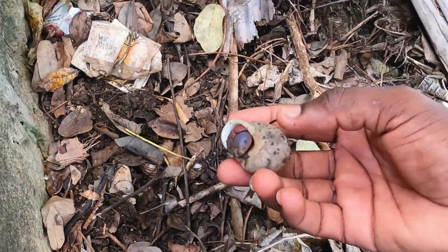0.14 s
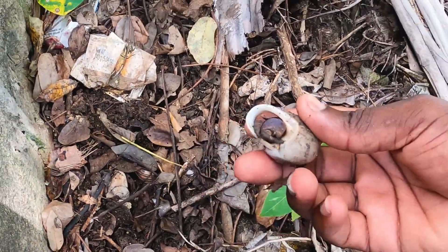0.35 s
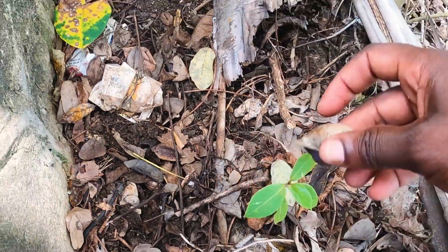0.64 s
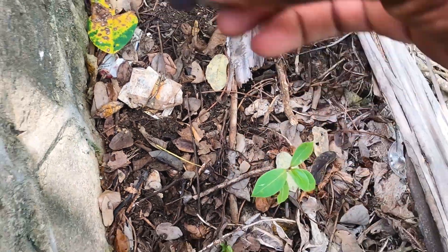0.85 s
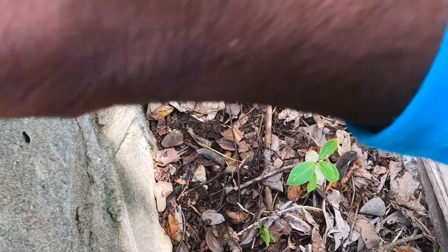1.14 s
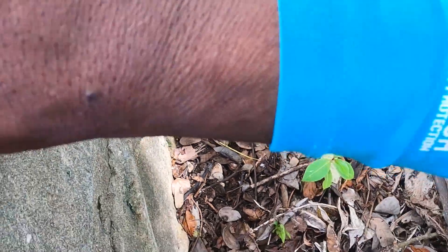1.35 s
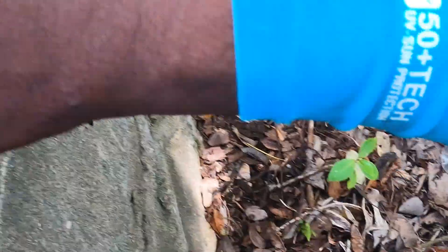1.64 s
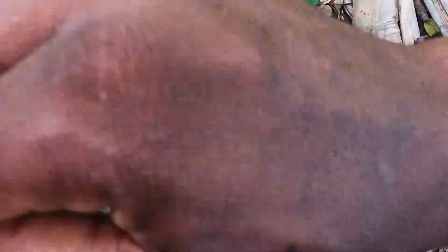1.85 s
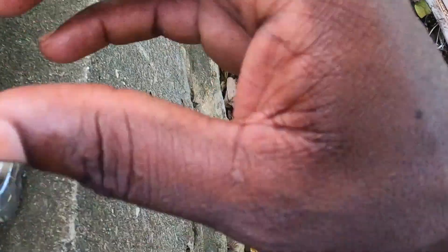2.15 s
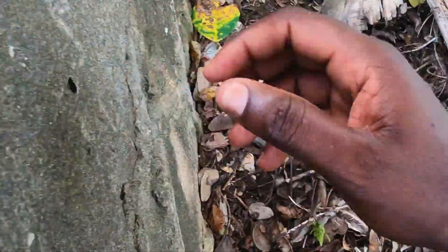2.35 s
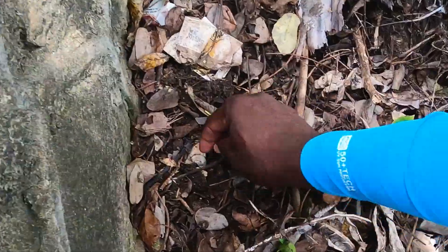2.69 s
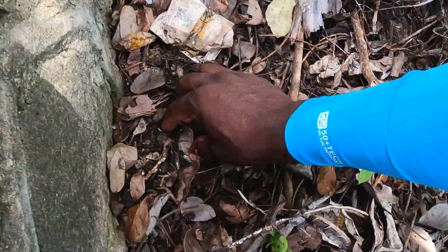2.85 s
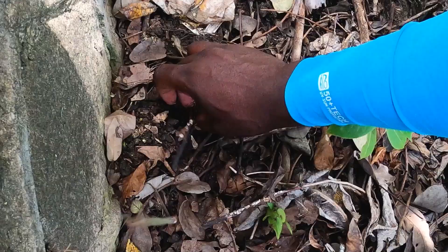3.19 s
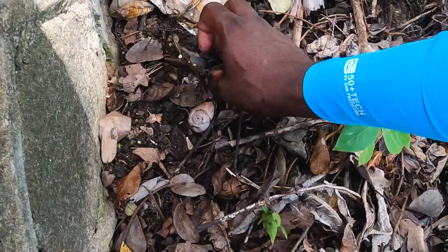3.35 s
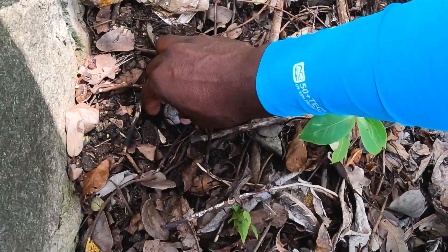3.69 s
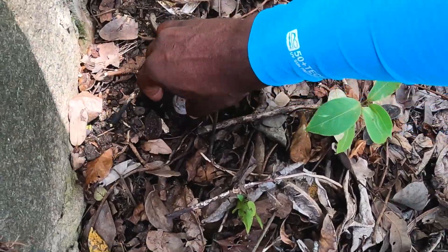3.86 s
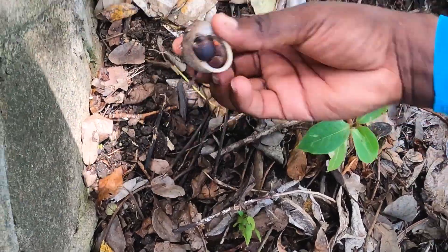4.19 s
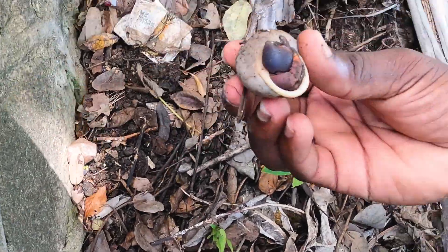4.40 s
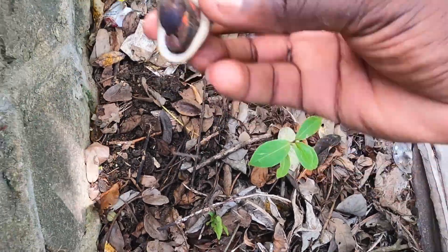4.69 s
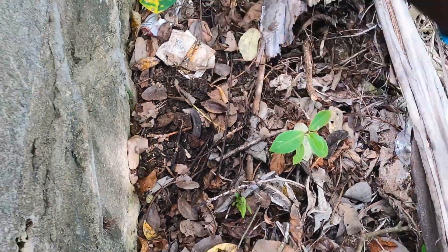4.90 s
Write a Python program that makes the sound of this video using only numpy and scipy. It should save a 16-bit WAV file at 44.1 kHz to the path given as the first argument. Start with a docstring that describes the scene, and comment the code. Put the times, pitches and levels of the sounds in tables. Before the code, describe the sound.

Handling thumps and skin creaks on a held plastic case, with sharp nail clicks, small twig snaps and quiet rustling leaf litter.

```python
"""Shifting fingers knock and creak on the case of a phone held outdoors: struck and rubbed damped modes.
The other hand picks hermit crabs out of dry leaf litter: coloured sprays of tiny bursts make the leaves crackle,
bright puffs of noise with short hollow notes make the twigs snap. A few fingernail clicks ring the case.
A low distant rumble and a faint hiss, both coloured noise, lie behind.
The phone's gain control ducks everything after the loudest knocks."""
import sys
import numpy as np
from scipy import signal
from scipy.fft import rfft, irfft
from scipy.io import wavfile
from scipy.ndimage import uniform_filter1d, minimum_filter1d

SR = 44100
rng = np.random.default_rng(int(sys.argv[2]) if len(sys.argv) > 2 else 0)


def materialize(psi):
    """Save the field psi as 16-bit PCM at rate SR to the path in sys.argv[1].

    A 1-D psi becomes a single channel; in a 2-D psi each row is a channel.
    """
    bounded = np.clip(np.atleast_2d(psi).T, -1, 1)
    quanta = np.round(bounded * 32767).astype(np.int16)
    wavfile.write(sys.argv[1], SR, quanta)


N = 221955
TIME = np.arange(N) / SR
HIT_TIME = np.arange(4096) / SR  # s, span of one short sound
ATTACK_SAMPLES = 441  # the first 10 ms, over which a short sound's level is set


def undb(db):
    """Decibels to gain."""
    return 10 ** (np.asarray(db) / 20)


def unit(x, count=None):
    """Scale to rms 1, judged over the first count samples."""
    return x / np.sqrt(np.mean(x[:count] ** 2) + 1e-18)


def colour(x, points):
    """Filter x by a smooth curve of (f/Hz, level/dB) points, then bring it to rms 1."""
    hz, db = np.transpose(points)
    bins = np.maximum(np.fft.rfftfreq(len(x), 1 / SR), 1)
    gain = undb(np.interp(np.log(bins), np.log(hz), db))
    return unit(irfft(rfft(x) * gain, len(x)))


def add(out, s, sound):
    """Mix a sound in at s seconds."""
    i = int(np.clip(s * SR, 0, N - 1))
    out[i:i + len(sound)] += sound[:N - i]


def swell(start_s, length_s, attack_s, release_s):
    """Envelope of a stroke: it rises to its start, holds for its length and dies away."""
    rise = np.clip(1 + (TIME - start_s) / attack_s, 0, 1)
    return rise * np.exp(-np.clip((TIME - start_s - length_s) / release_s, 0, 20))


def burst(points, decay_s):
    """A dying puff of coloured noise, at rms 1 during its attack."""
    noise = colour(rng.standard_normal(len(HIT_TIME)), points)
    return unit(noise * np.exp(-HIT_TIME / decay_s), ATTACK_SAMPLES)


def drive(force, response):
    """Sound of a body pushed by a force: the force convolved with the body's response."""
    return signal.fftconvolve(force, response)[:len(force)]


def spray(rate, spread_db, length_s):
    """Random little bursts of noise, rate per second, mostly small with a few large ones."""
    size = undb(spread_db * np.minimum(rng.exponential(size=N), 4))
    starts = (rng.random(N) < rate / SR) * size
    power = drive(starts ** 2, np.exp(-HIT_TIME / length_s))
    return np.sqrt(np.abs(power)) * rng.standard_normal(N)


def contact(slip_s, grit):
    """Force of a contact: one sharp push, then a dying spray of tiny slips."""
    force = rng.standard_normal(len(HIT_TIME)) * np.exp(-HIT_TIME / slip_s)
    force *= grit / np.linalg.norm(force)
    force[0] += 1
    return force


def ring(modes, scatter_db, detune, stretch=1):
    """Impulse response of damped modes; each contact point weights and tunes them a little differently."""
    hz, db, t60 = np.array(modes).T[:, :, None]
    size, shift = rng.standard_normal((2, len(modes), 1))
    polarity = (-1) ** np.arange(len(modes))[:, None]
    swing = np.sin(2 * np.pi * hz * stretch * (1 + detune * shift) * HIT_TIME)
    envelope = undb(db + scatter_db * size - 60 * HIT_TIME / t60)
    return np.sum(polarity * envelope * swing, axis=0)


# spectrum of the distant rumble and hiss: f/Hz, relative level/dB per Hz
AIR_COLOUR = [(20, -8), (45, -8), (75, 1), (95, -6), (118, 0), (160, -14), (250, -11.5), (340, -23),
              (750, -20), (1300, -27), (2400, -37), (6000, -42.5), (12000, -49), (16000, -59)]
AIR_DB = -46


def air():
    """Far-off rumble with a smooth hiss above it: steady noise with a falling spectrum."""
    return undb(AIR_DB) * colour(rng.standard_normal(N), AIR_COLOUR)


# tone of the dry leaves: f/Hz, relative level/dB
LEAF_COLOUR = [(600, -22), (1800, -16), (3500, -7), (6000, -8.5), (9000, -8.5), (13000, -7.5), (16000, -15)]
# strokes of the hand stirring the leaves: start t/s, length t/s, level/dB
RUSTLES = [(0.031, 0.028, -58), (0.756, 0.09, -60.5), (.97, 0.13, -63.5), (2.49, 1, -64),
           (2.684, 0.034, -54.5), (2.838, 0.054, -56), (3.009, 0.041, -53.5), (3.419, 0.035, -57.5),
           (4.02, 0.039, -60), (4.789, .05, -66)]
RUSTLE_ATTACK_S, RUSTLE_RELEASE_S = 0.026, .04
LITTER_DB = -67.5  # faint crackle between rustles


def leaves():
    """Dry leaves bend and scrape: countless tiny cracks, each smeared by the litter around it."""
    power = undb(LITTER_DB) ** 2
    for s, length_s, db in RUSTLES:
        stroke = undb(db) * swell(s, length_s, RUSTLE_ATTACK_S, RUSTLE_RELEASE_S)
        power = power + stroke ** 2
    crackle = spray(rate=720, spread_db=3.0, length_s=0.0014)
    return np.sqrt(power) * colour(crackle, LEAF_COLOUR)


def scatter(t60_s, db):
    """Faint diffuse return of a crack from the ground and the rock beside it."""
    noise = colour(rng.standard_normal(len(HIT_TIME)), LEAF_COLOUR)
    return noise * undb(db - 60 * HIT_TIME / t60_s)


# tone of a brittle crack: f/Hz, relative level/dB
SPLINTERS = [(600, -20), (2000, -9.5), (6000, -0.5), (11000, 1.5), (16000, -10.5)]
# twigs and leaves snapping: t/s, crack level/dB, hollow body level/dB, body f/Hz
SNAPS = [(.038, -56.5, -60, 3560), (.436, -64, -76, 2000), (0.7109, -54, -44, 940),
         (.752, -65, -54.5, 2000), (.78, -54, -59.5, 2260), (0.842, -68, -53.5, 1900),
         (1.0261, -59, -63, 2380), (1.361, -47, -53, 5700), (2.088, -35.5, -42, 4000),
         (2.4209, -53, -60, 5060), (2.5408, -45, -50, 1390), (2.6821, -33.5, -38.5, 1516),
         (3.0257, -50, -69, 2000), (3.2208, -53, -62, 2000), (3.277, -48, -43, 3260),
         (3.466, -52, -58, 1995), (3.761, -55.5, -61, 2420)]


def snaps():
    """Something brittle gives way: a bright crack and a short hollow note of the broken piece."""
    out = np.zeros(N)
    for s, crack_db, body_db, hz in SNAPS:
        note = np.sin(2 * np.pi * hz * HIT_TIME) * np.exp(-HIT_TIME / 0.0011)
        body = unit(drive(contact(slip_s=0.003, grit=1.9), note), ATTACK_SAMPLES)
        crack = burst(SPLINTERS, decay_s=0.0025) + scatter(t60_s=.25, db=-22)
        add(out, s, undb(crack_db) * crack + undb(body_db) * body)
    return out


# modes of the held case, before grip and palm: f/Hz, relative level/dB, t60 t/s
CASE = [(216.4, -18, 0.079), (308, -10, 0.032), (378.8, -1.5, 0.085), (466, 0.5, 0.028),
        (528.7, -2.5, 0.04), (640, -3.5, 0.043), (791, -7, 0.011), (1197, 5, 0.023), (1329, 5.5, 0.021),
        (1566, -2, 0.017), (1865.3, -8, 0.018), (2362, -17, 0.027), (3510, 2, 0.0086), (3940, 6.5, 0.0068),
        (4824, 3.5, 0.0084), (5300, -5.5, 0.028), (5990, 2, 0.0064), (7840, -10.5, 0.0084),
        (9150, -3.5, .008), (10850, -3, 0.0025), (11700, -5.5, 0.0016)]
# the case's three registers, thud, ring and tick: from f/Hz, to f/Hz
REGISTERS = [(0, 950), (950, 2600), (2600, 16000)]


def registers():
    """The case's modes, sorted into thud, ring and tick."""
    return [[m for m in CASE if lo <= m[0] < hi] for lo, hi in REGISTERS]


# the palm lies on the case for a while and lowers its deepest modes: t/s, pitch factor
PALM = [(1.3, 0.94), (1.6, 0.88), (1.9, 0.79), (2.02, 0.816), (2.07, 1)]
PALM_BELOW_HZ = 420


def under_palm(modes, s):
    """The case's modes as the weight of the palm tunes them at s seconds."""
    factor = np.interp(s, *np.transpose(PALM))
    return [(hz * factor if hz < PALM_BELOW_HZ else hz, db, t60) for hz, db, t60 in modes]


# rasp of skin on the case: f/Hz, relative level/dB
SKIN = [(60, -28), (180, -15), (320, 0), (700, 11), (1500, 4), (2400, -12.5), (3500, -9), (7000, -28.5),
        (16000, -49)]
# skin dragging on the case: start t/s, length t/s, level/dB, brightness level/dB
DRAGS = [(1.34, 0.048, -39.5, -14), (1.412, 0.077, -42, -19), (1.573, .02, -46, -3.5),
         (1.642, 0.15, -41, -15), (1.719, 0.041, -26.5, -2.5), (1.827, 0.044, -36, -8),
         (1.937, 0.032, -23.5, -6.5), (2.06, 0.093, -23, -17), (2.834, 0.05, -37.5, -29),
         (3.046, 0.063, -38, -21), (3.668, 0.014, -40, -27), (4.157, 0.027, -32.5, -42),
         (4.65, 0.29, -50.5, -33)]
DRAG_ATTACK_S, DRAG_RELEASE_S = 0.011, 0.018
# the hand never lies quite still once it has shifted
GRIP_FROM_S, GRIP_DB, GRIP_BRIGHT_DB = 1.3, -56, -19.5
# a brighter drag rings the panels more: level at brightness 0 dB, dB gained per dB of brightness
PANEL_DB, PANEL_FOLLOWS = -1.5, 0.51


def rub():
    """Skin sticks and slips on the case in a dense, uneven creak that drives the modes."""
    slips = spray(rate=700, spread_db=3.5, length_s=0.001)
    low, middle, high = registers()
    panel = unit(drive(slips, ring(middle, scatter_db=0, detune=0.009)))
    tick = unit(drive(slips, ring(high, scatter_db=0, detune=0.009)))
    fizz = undb(-8) * tick + undb(-9) * colour(slips, SPLINTERS)
    rasp = undb(-8) * colour(slips, SKIN)
    grip = (GRIP_FROM_S, N / SR - GRIP_FROM_S, GRIP_DB, GRIP_BRIGHT_DB)
    out = np.zeros(N)
    for s, length_s, db, bright_db in [grip, *DRAGS]:
        # so light a touch does not stir the lowest mode
        body = ring(under_palm(low[1:], s + length_s / 2), scatter_db=2.0, detune=.008)
        thud = unit(drive(slips, body))
        panel_gain = undb(PANEL_DB + PANEL_FOLLOWS * bright_db)
        creak = thud + rasp + panel_gain * panel + undb(bright_db) * fizz
        out += undb(db) * swell(s, length_s, DRAG_ATTACK_S, DRAG_RELEASE_S) * creak
    return out


# hard fingernail clicks on the case: t/s, crack level/dB, panel ring level/dB
CLICKS = [(1.33, -44, -37), (1.704, -8, -11.5), (1.7449, -22, -24), (1.8182, -36.5, -35.5)]


def clicks():
    """A nail strikes the case: so short a push rings the highest modes most."""
    out = np.zeros(N)
    _, middle, high = registers()
    for s, crack_db, ring_db in CLICKS:
        force = contact(slip_s=.001, grit=0.91)
        sharp_force = np.diff(force, prepend=0)  # the slope of the push favours the treble
        tick = unit(drive(sharp_force, ring(high, scatter_db=2.5, detune=0.0035)), ATTACK_SAMPLES)
        crack = tick + undb(-1.5) * burst(SPLINTERS, decay_s=0.0036)
        panel = unit(drive(force, ring(middle, scatter_db=0, detune=.01, stretch=1.03)), ATTACK_SAMPLES)
        crack = crack + scatter(t60_s=0.14, db=-26)
        add(out, s, undb(crack_db) * crack + undb(ring_db) * panel)
    return out


def gripped(modes, stiffness, slope_db):
    """A firmer grip favours the upper modes of a register."""
    tilt_db = slope_db * np.log2(stiffness)  # per octave above the lowest mode
    return [(hz, db + tilt_db * np.log2(hz / modes[0][0]), t60) for hz, db, t60 in modes]


# finger knocks on the case: t/s, thud level/dB, hardness [0-1], grip stiffness [factor],
# lead of the light touch before it t/s [0 for none]
KNOCKS = [(1.313, -31, 0.63, 0.6, 0.015), (1.34, -26.5, 0.5, 0.89, 0), (1.365, -31.5, 0.55, 2.2, 0.00028),
          (1.373, -21.5, 0.14, 0.9, 0.0017), (1.393, -20.5, 0.41, 1.13, 0),
          (1.441, -39, 0.25, 0.97, 0.0011), (1.574, -21.5, 0.71, 1.74, 0.017), (1.608, -45, 1, 0.82, 0),
          (1.676, -32.5, 0.35, 1.37, .027), (1.744, -20.5, 0.73, 2.4, 0.0036), (1.795, -27.5, .7, 1.1, 0),
          (1.935, -29.5, 0.53, 1.05, 0.00031), (1.943, -26.5, 0.87, 2.6, 0.0023),
          (1.963, -25, 0.87, 1.03, 0.00092), (1.999, -31.5, 0.43, 0.82, 0.0024),
          (2.042, -16.5, 0.59, 1.46, 0.0028), (2.052, -1, 0.8, 0.8, 0.0016),
          (2.106, -11.5, 0.2, 0.84, 0.0019), (2.125, -11, 0.74, 1.055, 0.00036),
          (2.152, -15.5, 0.26, 1.08, 0.028), (2.194, -20.5, .45, 1, 0.0001), (2.233, -8.5, 0.4, 1.09, 0),
          (2.265, -21.5, 0.44, 1.24, 0.0029), (2.289, -32.5, 0.62, 0.78, 0),
          (2.567, -33, 0.24, 0.78, 0.00061), (2.594, -35.5, 0.43, 1.04, 0.0095),
          (2.847, -24, 0.34, 0.88, 0.023), (3.08, -26, 0.28, 1, 0.027), (3.105, -27, 0.23, 0.86, 0.0016),
          (3.291, -24, 0.37, 0.95, 0.018), (3.456, -44, 0.55, 2.2, 0.00039),
          (3.474, -39, .4, 0.98, 0.00033), (3.688, -24, 0.39, 0.89, 0.023),
          (3.862, -35.5, 0.21, 0.85, 0.022), (3.933, -39, 0, 0.77, 0), (3.983, -31, 0.37, 1.12, 0.013),
          (3.997, -32, 0.32, 0.86, 0.0012), (4.148, -30.5, 0.33, 0.68, 0.001),
          (4.166, -21.5, 0.32, 1.03, 0.0004), (4.244, -44.5, 0.22, 1.06, 0),
          (4.307, -42.5, 0.29, 1.06, 0.0025), (4.45, -31.5, .25, 1.01, 0),
          (4.536, -27.5, 0.27, 1.11, 0.0087), (4.678, -31.5, .2, 1.03, 0.017), (4.8, -32, .3, 1.05, 0.013),
          (4.867, -39.5, 0.31, 1, 0.018)]
# the touch before a knock: its level before a 0 dB knock, dB gained per dB of the knock, extra hardness
TOUCH_DB, TOUCH_FOLLOWS, TOUCH_HARDER = -26.5, 0.3, 0.099
# the finger settles after a knock: delay, its spread, level against the knock, share of hardness left
SETTLE_S, SETTLE_SPREAD_S, SETTLE_DB, SETTLE_HARDNESS = .014, .002, -13, 0.58


def touches():
    """A finger touches lightly, knocks, then settles: each contact as (s, level dB, hardness, stiffness)."""
    for s, db, hardness, stiffness, lead_s in KNOCKS:
        if lead_s > 0:
            yield s - lead_s, TOUCH_DB + TOUCH_FOLLOWS * db, hardness + TOUCH_HARDER, stiffness
        yield s, db, hardness, stiffness
        settled_s = s + SETTLE_S + SETTLE_SPREAD_S * rng.standard_normal()
        yield settled_s, db + SETTLE_DB, hardness * SETTLE_HARDNESS, stiffness


# ring and tick against the thud: level/dB for the softest contact, level/dB for the hardest
RING_DB, TICK_DB = (-19, 2), (-39.5, 0.5)


def knocks():
    """A finger creeps, catches and lets go: the whole case thuds, its panels ring and the contact ticks."""
    out = np.zeros(N)
    low, middle, high = registers()
    for s, db, hardness, stiffness in touches():
        # a harder contact rings and ticks more
        ring_db, tick_db = (soft + hardness * (hard - soft) for soft, hard in (RING_DB, TICK_DB))
        held = gripped(under_palm(low, s), stiffness, slope_db=21.5)
        body = ring(held, scatter_db=2, detune=0.025, stretch=stiffness ** 0.11)
        # the heavy body takes a moment to get moving
        onset = 1 - np.exp(-HIT_TIME / 0.00039)
        thud = unit(drive(contact(slip_s=0.01, grit=0.31), body) * onset, ATTACK_SAMPLES)
        push = contact(slip_s=0.006, grit=0.68)
        panel = unit(drive(push, ring(middle, scatter_db=-3, detune=0.04)), ATTACK_SAMPLES)
        scrape = contact(slip_s=0.0031, grit=4.6)
        tick = unit(drive(scrape, ring(high, scatter_db=5.5, detune=0.055)), ATTACK_SAMPLES)
        # the skin's own rasp fills in between the resonances
        panel = panel + burst(SKIN, decay_s=0.0068)
        # the harder the contact, the more it splinters into the top octave
        tick = tick + undb(0.22 * tick_db - 6.5) * burst(SPLINTERS, decay_s=0.0052)
        add(out, s, undb(db) * (thud + undb(ring_db) * panel + undb(tick_db) * tick))
        # the skin creeps for a few milliseconds before it breaks loose: a puff played backwards
        creep = burst(SKIN, decay_s=0.0059)[::-1]
        add(out, s - HIT_TIME[-1], undb(db + ring_db - 17) * creep)
    return out


def scene():
    """Everything as it reaches the one microphone."""
    return (knocks() + rub() + clicks() + snaps() + leaves() + air())[None]


# the phone's gain control: ceiling, time for which it stays down, speed at which it comes back
CEILING_DB, HOLD_S, RECOVER_DB_PER_S = -14, 0.073, 32.5


def gain_control(x):
    """Turn down just ahead of anything over the ceiling, hold, then come back at a steady rate."""
    window, ahead = 330, 130  # samples
    loudness_db = 10 * np.log10(np.abs(uniform_filter1d(x ** 2, window)) + 1e-18)
    needed_db = np.minimum(CEILING_DB - loudness_db, 0)
    half = int(HOLD_S * SR / 2) + ahead
    held_db = minimum_filter1d(needed_db, 2 * half + 1, origin=half - ahead)
    # a running minimum against a rising ramp limits the speed of recovery
    recovery_db = RECOVER_DB_PER_S * TIME
    gain_db = np.minimum.accumulate(held_db - recovery_db, axis=-1) + recovery_db
    return x * undb(uniform_filter1d(gain_db, ahead))


TOP_HZ = 16000


def record(dry):
    """The gain control ducks after the loudest knocks, a fast limiter holds the peaks; the top is cut."""
    ducked = gain_control(dry)
    ceiling, size = .56, 45  # amplitude, samples
    needed = ceiling / np.maximum(np.abs(ducked), ceiling)
    gain = uniform_filter1d(minimum_filter1d(needed, size), size)
    top_cut = signal.ellip(8, .2, 70, TOP_HZ, fs=SR, output="sos")
    return signal.sosfilt(top_cut, gain * ducked)


dry = scene()
out = record(dry)
materialize(out)
```